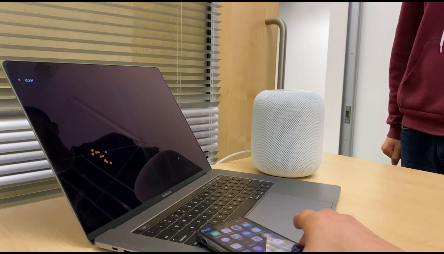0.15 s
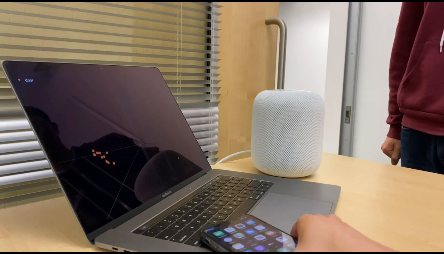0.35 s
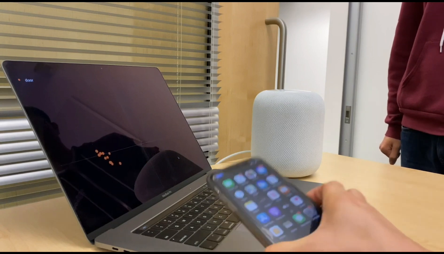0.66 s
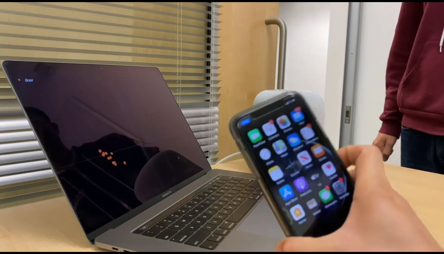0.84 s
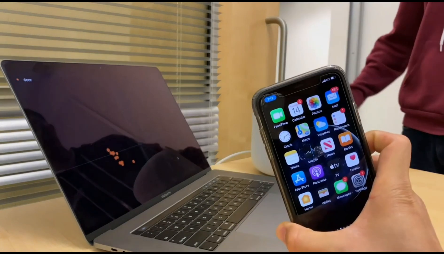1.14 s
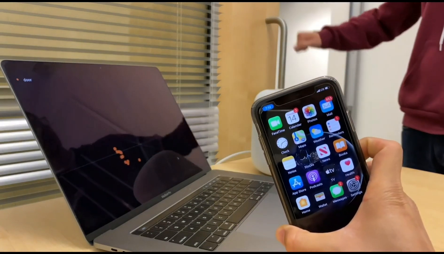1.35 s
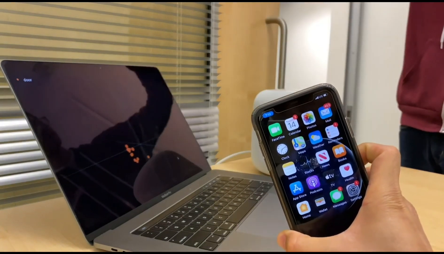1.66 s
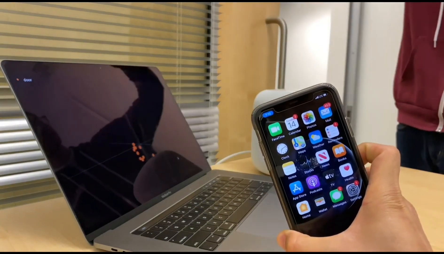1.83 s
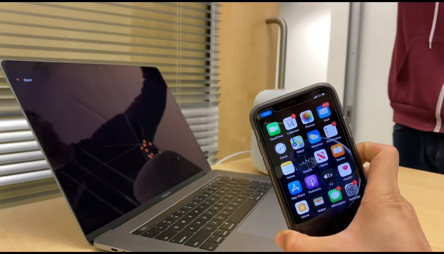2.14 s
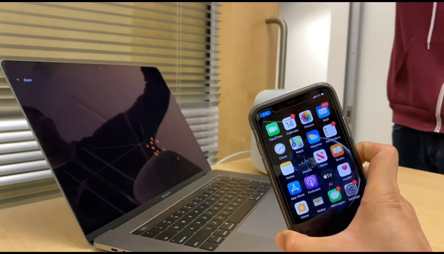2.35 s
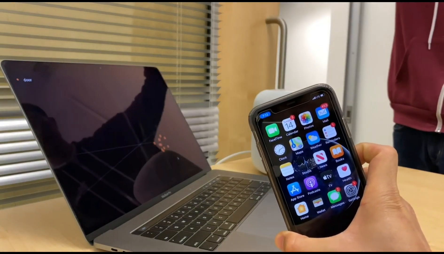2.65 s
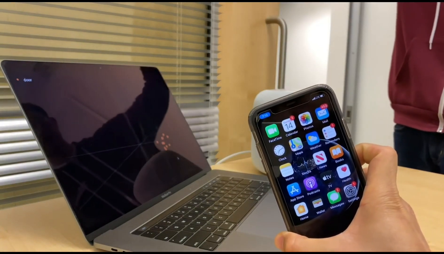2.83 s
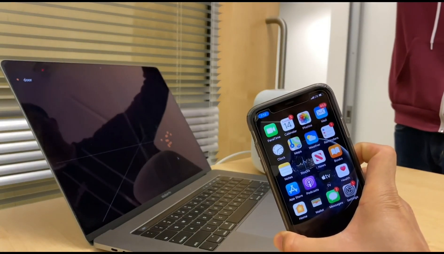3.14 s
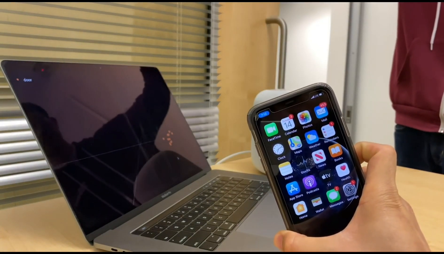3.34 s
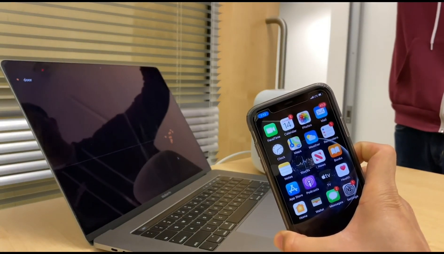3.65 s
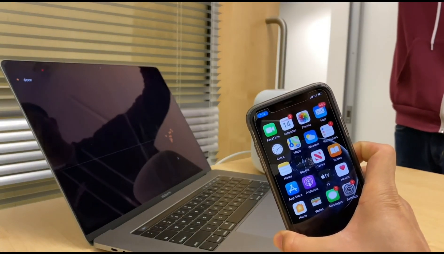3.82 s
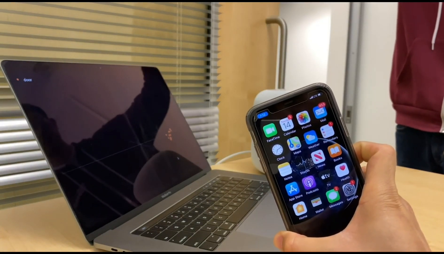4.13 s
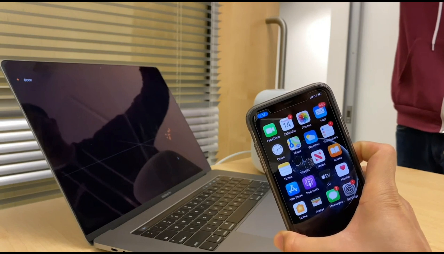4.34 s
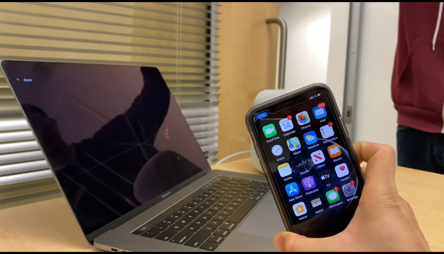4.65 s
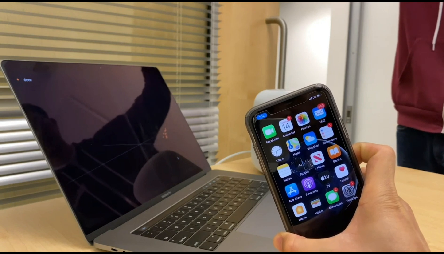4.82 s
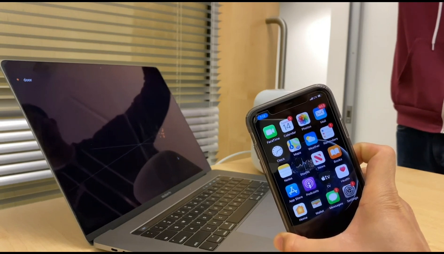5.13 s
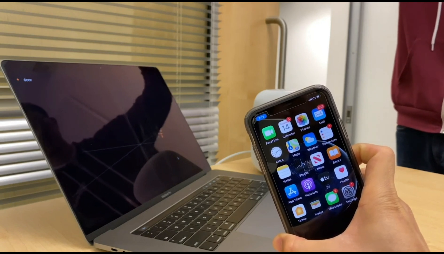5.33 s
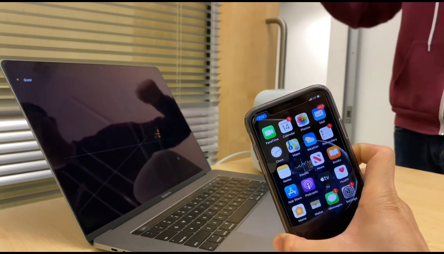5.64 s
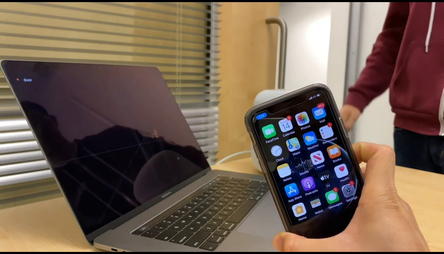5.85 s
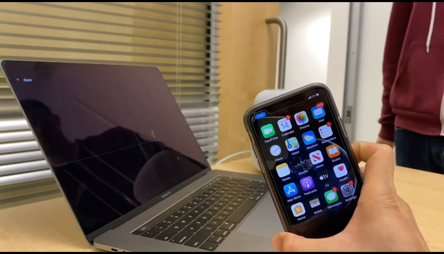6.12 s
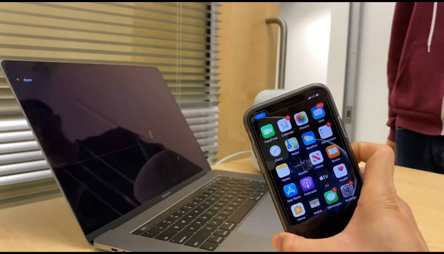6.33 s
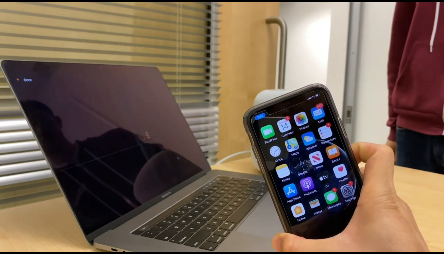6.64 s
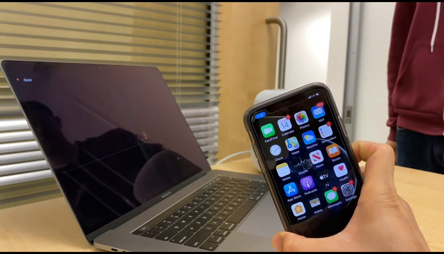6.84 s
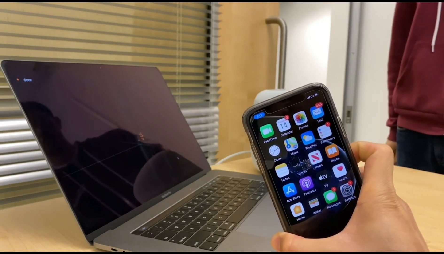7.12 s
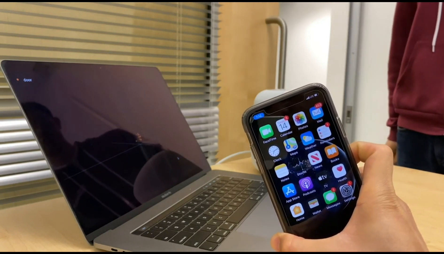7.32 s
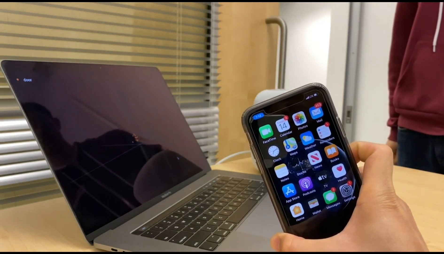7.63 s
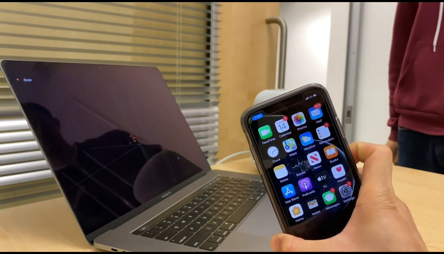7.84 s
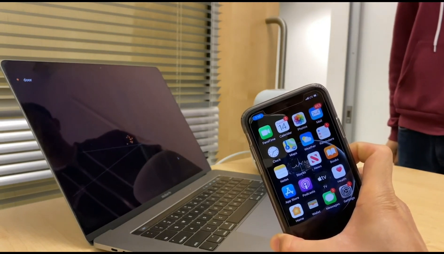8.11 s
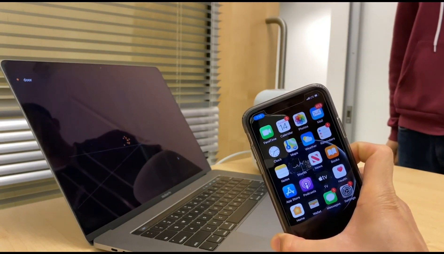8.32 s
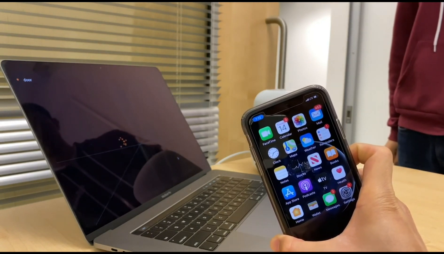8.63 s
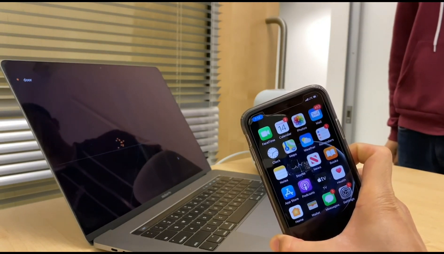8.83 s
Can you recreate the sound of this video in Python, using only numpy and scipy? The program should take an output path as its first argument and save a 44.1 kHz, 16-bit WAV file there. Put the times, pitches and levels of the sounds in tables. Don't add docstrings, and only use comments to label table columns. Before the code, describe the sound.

Quiet indoor room tone with low motor hum comes first, with small nail taps, a light scrape and soft sleeve rustle near the microphone. After about two seconds someone raps a wooden door seven times at a steady pace, varying slightly in force. The knocks are abrupt, woody and clipped, with a lingering frame resonance, deep faint boom and tiny latch ticks.

```python
import sys
import numpy as np
from scipy import signal
from scipy.io import wavfile

SR = 44100
rng = np.random.default_rng(int(sys.argv[2]) if len(sys.argv) > 2 else 0)


def output_pcm(signal):
    pcm = np.clip(np.atleast_2d(signal).T, -1, 1) * 32767
    wavfile.write(sys.argv[1], SR, np.round(pcm).astype(np.int16))


def volts_from_db(level):
    exponent = np.asarray(level, float) / 20
    return 10 ** exponent


N = 395594

# [t/s, strength/dB, gap/ms, second knuckle's strength as a
# fraction of the first's 0-1, bone crack level/dB]
KNOCKS = [
    (2.393, 0, 1.275, 0.6, -41.5),
    (2.826, 1.5, 0.23, 0.27, -35),
    (3.247, -2, 0.785, 0.4, -42),
    (3.679, -1, 0.35, 0.71, -49),
    (4.16, 1.5, 0.35, 0.13, -37),
    (4.652, 0, 0.32, .8, -43.5),
    (5.156, -1.5, 0.49, 0.45, -41),
]
RANGES_HZ = [120, 270, 450, 1050, 1700, 3000, 7000]


def blows():
    arm_db = -18.5
    low_db, middle_db, high_db = -10.5, -5.5, -20.5
    high_follows = 0.41
    high_pairing = 0.5
    s, db, gap_ms, share, crack_db = np.transpose(KNOCKS)
    first = 1 / (1 + np.clip(share, 0, 1))
    hard = volts_from_db(high_db + high_follows * (crack_db - crack_db.mean()))
    lead = s + 0.001
    follow = lead + gap_ms / 1000
    lead_gain, follow_gain = volts_from_db(db) * first, volts_from_db(db) * (1 - first)
    pair = clicks(lead, lead_gain) + clicks(follow, follow_gain)
    high = clicks(lead, lead_gain * hard) + clicks(follow, follow_gain * hard * high_pairing)
    arm = clicks(lead, volts_from_db(arm_db))
    crack = clicks(lead, volts_from_db(db + crack_db))
    return [arm, volts_from_db(low_db) * pair, pair, volts_from_db(middle_db) * pair, high, crack]


def door():
    # [f/Hz, left level/dB, right level/dB, time to fade 60 dB/s]
    panel = [(209, 0, -1, 0.036), (240.6, -1, 0, 0.24), (298.3, 2, 1.5, 0.12), (374, 6.5, 3, 0.033),
             (515, -4.5, -18, 0.024), (590.6, -14.5, -8, 0.15), (673.3, -3.5, -8, 0.069),
             (745, -1.5, -15, 0.19), (826, -9, -4.5, 0.063), (894, -11.5, -12.5, 0.073),
             (965, -14, -6, 0.09), (1070, -5.5, -2.5, 0.1), (1180, -1.5, -6.5, 0.058),
             (1266, 1.5, 7.5, 0.042), (1380, 3.5, 0, 0.034), (1484.3, -9, -23.5, 0.17),
             (1650, -13.5, -4, 0.024), (1800, 7, -1.5, 0.065), (2052, 2.5, 6.5, 0.054),
             (2293, -0.5, -4.5, 0.045), (2517, -1, -0.5, 0.02)]
    crack = crackle(blows()[-1], t60=0.01)
    crack = band(band(crack, 2600, 4800), 2400, 5400)
    return struck(panel) + volts_from_db(20.5) * crack


def frame():
    # [f/Hz, left level/dB, right level/dB, time to fade 60 dB/s]
    frame_modes = [(191, -11.5, -3, 0.8), (276.4, -7.5, -13.5, 0.75), (483.6, -19, -26.5, 0.73),
                   (640.4, -18.5, -30, 0.71), (695.6, -9.5, -19.5, 0.44), (712, -22, -28, 0.82),
                   (905, -32, -28.5, 0.83), (1068, -22.5, -23, 0.56), (1320, -14, -30.5, 0.58),
                   (1453, -24.5, -25.5, 0.38), (1520, -19.5, -15, 0.31)]
    return struck(frame_modes)


def struck(modes):
    force, out = blows(), np.zeros((2, N))
    for k, (hz, left_db, right_db, t60) in enumerate(modes):
        push = force[np.searchsorted(RANGES_HZ, hz) - 1]
        sign = (-1) ** k
        out += sign * ring(push, hz, t60) * volts_from_db([[left_db], [right_db]])
    cushion = signal.butter(4, 2600, fs=SR, output="sos")
    return volts_from_db(-4.5) * signal.sosfilt(cushion, out)


def near_walls(x):
    # [delay t/s, left level/dB, right level/dB]
    echoes = [(.0042, -2.5, -22), (.0085, -12.5, -17.5), (0.0153, -0.5, -21), (0.0204, -24, -9.5),
              (.0265, -1, -14), (.045, -17.5, -19)]
    out = x.copy()
    dull = signal.lfilter(*signal.butter(1, 1800, fs=SR), x)
    for delay, left_db, right_db in echoes:
        lag = int(delay * SR)
        out[:, lag:] += dull[:, :-lag] * volts_from_db([[left_db], [right_db]])
    return out


def office():
    # [f/Hz, t/s]
    tail_t60 = [(100, 0.77), (250, 1), (500, 0.71), (750, 0.75), (1000, 0.63), (1500, 1), (2000, 0.45),
                (3000, 0.13), (5000, 0.27), (9000, 0.088)]
    # [f/Hz, level/dB]
    tail_tone = [(100, -10.5), (220, -5), (300, -0.5), (400, -12.5), (550, -9.5), (750, -11), (900, -10.5),
                 (1200, -11), (1500, -16.5), (1800, -16), (2300, -13.5), (3300, -8.5), (5000, -15.5),
                 (9000, -25)]
    t = np.arange(SR) / SR
    radiated = 0
    for force, low, high in zip(blows(), RANGES_HZ, RANGES_HZ[1:]):
        radiated = radiated + band(band(force, low, high), low / 1.2, high * 1.06)
    white = rng.standard_normal((2, 2, SR))
    edges = 80 * 2 ** np.arange(0, 7.1, 1 / 3)
    tail = 0
    for k, (low, high) in enumerate(zip(edges, edges[1:])):
        hz = np.sqrt(low * high)
        build = 1 - np.exp(-(t / 0.012) ** 2 * hz / 700)
        fade = volts_from_db(colour(tail_tone, hz) + 10.5 - 60 * t / colour(tail_t60, hz))
        tail = tail + stereo(*band(white[k % 2], low, high), hz) * fade * build
    return signal.fftconvolve(radiated[None], tail, axes=1)[:, :N]


def boom():
    # [f/Hz, level/dB, time to fade 60 dB/s]
    room_modes = [(74.1, -7, 0.5), (84.4, 2.5, 0.26)]
    rows = np.array(KNOCKS)
    pushes = clicks(rows[:, 0] + 0.02, volts_from_db(rows[:, 1] - 16.0))
    out = 0
    for hz, db, t60 in room_modes:
        wall = ring(pushes, hz, t60)
        out = out + volts_from_db(db - 62.5) * ring(wall, hz * 1.03, t60)
    return out


def handling():
    return ticking() + nail_taps() + rustle()


def ticking():
    # [t/s, peak level/dB, centre f/Hz, length/s, left over right level/dB]
    desk = [
        (0.208, -45.5, 2190, 0.12, 12),
        (0.477, -45.5, 7830, 0.018, 4),
        (0.48, -47, 3500, 0.19, -5),
        (.487, -64, 9200, 0.11, -5),
    ]
    # [t/s, peak level/dB]
    latch = [
        (3.009, -53.5),
        (3.415, -56.5),
        (4.204, -42),
        (4.208, -54),
        (5.205, -48.5),
    ]
    t, out = np.arange(SR // 4) / SR, np.zeros((2, N))
    latch_hz, latch_s, latch_pan_db = 6300, 0.0045, -4
    latch_ticks = [(s, db, latch_hz, latch_s, latch_pan_db) for s, db in latch]
    for s, db, hz, length, pan_db in [*desk, *latch_ticks]:
        burst = rng.standard_normal(SR // 4) * volts_from_db(db - 60 * t / length)
        burst = band(band(burst, hz / 4.4, hz * 2.0), hz / 4.5, hz * 2.1)
        i = int(s * SR)
        out[:, i:i + SR // 4] += burst * volts_from_db([[pan_db / 2], [-pan_db / 2]])
    return out


def nail_taps():
    # [t/s, level/dB]
    taps = [
        (0.197, -57.5),
        (.204, -60),
        (.214, -68.5),
    ]
    # [f/Hz, level/dB, time to fade 60 dB/s]
    case = [(2050, 10, .025), (3090, 11, 0.027), (3680, 4, 0.028), (4500, -1, .015)]
    s, db = np.transpose(taps)
    nail = band(crackle(clicks(s, volts_from_db(db)), t60=0.008), 1500, 4800)
    return sum(volts_from_db(level_db) * ring(nail, hz, t60) for hz, level_db, t60 in case)


def rustle():
    # [t/s of fullest contact, level/dB]
    strokes = [
        (0.0, -61.5),
        (.932, -64.5),
        (1.19, -84.5),
        (1.41, -71),
    ]
    swell, fade = 51, 93.5
    t = np.arange(N) / SR
    skin = rms_one(band(rng.standard_normal((2, N)), 2400, 3200))
    sleeve = rms_one(band(rng.standard_normal((2, N)), 2000, 6400))
    contact = sum(volts_from_db(db - np.maximum(swell * (s - t), fade * (t - s))) for s, db in strokes)
    return (skin + volts_from_db(-3.5) * sleeve) * contact


def motors():
    # [f/Hz, left level/dB, right level/dB, left lead/rad]
    tones = [(63.17, -35, -36.3, .08), (119.95, -35.4, -38, -.58), (69.5, -45, -46, .08),
             (29.5, -54, -55, .05)]
    # [f/Hz, level/dB]
    whines = [(818.3, -68.5), (1529, -79.5), (2902, -89)]
    t, out = np.arange(N) / SR, np.zeros((2, N))
    for hz, left_db, right_db, lead in tones:
        phase = 2 * np.pi * (hz * t + rng.random()) + [[lead], [0]]
        out += np.sqrt(2) * volts_from_db([[left_db], [right_db]]) * np.sin(phase)
    for hz, db in whines:
        out += 1.6 * volts_from_db(db) * np.sin(2 * np.pi * (hz * t + rng.random((2, 1))))
    return out


def ventilation():
    # [f/Hz, level/dB per Hz]
    air = [(15, -35), (30, -19.5), (50, -9), (110, -8), (170, -18), (250, -14), (380, -26.5), (420, -33.5),
           (650, -32), (850, -30), (2700, -52), (10000, -73), (11300, -78.5), (13000, -108)]
    # [f/Hz, width/Hz, level/dB]
    hums = [(67.6, 6.6, -48), (87.5, 4.9, -60), (131.1, 16, -46), (223.1, 34, -44.5), (301.8, 18, -48),
            (349.8, 26, -51), (2000, 50, -76.5)]
    white = rng.standard_normal((2, 2, N + SR))
    edges = 18 * 2 ** np.arange(0, 9.9, 1 / 3)
    out = 0
    for k, (low, high) in enumerate(zip(edges, edges[1:])):
        hz = np.sqrt(low * high)
        out = out + volts_from_db(colour(air, hz)) * stereo(*band(white[k % 2], low, high)[:, SR:], hz)
    top = signal.butter(8, 11000, fs=SR, output="sos")
    out = volts_from_db(-36.5) * rms_one(signal.sosfilt(top, out))
    for hz, width, db in hums:
        narrow = band(rng.standard_normal((2, N + SR)), hz - width / 2, hz + width / 2)[:, SR:]
        out = out + volts_from_db(db) * stereo(*rms_one(narrow), hz)
    return out * volts_from_db([[0.7], [-0.7]])


def clicks(times, gains):
    out, at = np.zeros(N), np.asarray(times) * SR
    np.add.at(out, at.astype(int), gains * (1 - at % 1))
    np.add.at(out, at.astype(int) + 1, gains * (at % 1))
    return out


def crackle(train, t60):
    t = np.arange(SR // 50) / SR
    burst = rng.standard_normal(SR // 50) * volts_from_db(-60 * t / t60)
    return signal.fftconvolve(train, burst / np.sqrt(np.sum(burst ** 2)))[:N]


def ring(force, hz, t60):
    r, w = volts_from_db(-60 / (t60 * SR)), 2 * np.pi * hz / SR
    return signal.lfilter([0, np.sin(w)], [1, -2 * r * np.cos(w), r * r], force + 1e-18)


def stereo(mid, side, hz):
    # [f/Hz, likeness -1 to 1]
    likeness = [(60, 0.92), (130, 0.8), (290, 0.69), (640, -0.46), (1410, -0.16), (3100, -0.052),
                (6820, 0.12), (15000, 0.28)]
    alike = np.clip(colour(likeness, hz), -1, 1)
    shared = np.sqrt(1 + alike) * mid
    opposed = np.sqrt(1 - alike) * side * [[1], [-1]]
    return (shared + opposed) / np.sqrt(2)


def band(x, low_hz, high_hz):
    sos = signal.butter(2, [low_hz, min(high_hz, 0.45 * SR)], "band", fs=SR, output="sos")
    return signal.sosfilt(sos, x)


def colour(points, hz):
    points_hz, values = np.transpose(points)
    return np.interp(np.log(hz), np.log(points_hz), values)


def rms_one(x):
    return x / np.sqrt(np.mean(x ** 2) + 1e-20)


def scene():
    knocks = near_walls(door()) + struck_room()
    return knocks + handling() + motors() + ventilation()


def struck_room():
    return frame() + office() + boom()


def low_pass(x):
    return signal.sosfilt(signal.butter(12, 16280, fs=SR, output="sos"), x)


def record(dry):
    to_nearest_end = np.minimum(np.arange(N), np.arange(N)[::-1])
    ease = np.clip(to_nearest_end / (0.004 * SR), 0, 1)
    return low_pass(np.clip(dry, -1, 1) * ease)


dry = scene()
out = record(dry)
output_pcm(out)
```